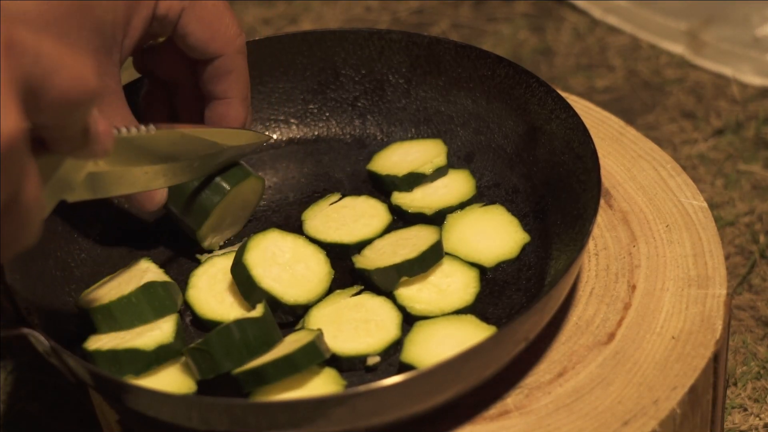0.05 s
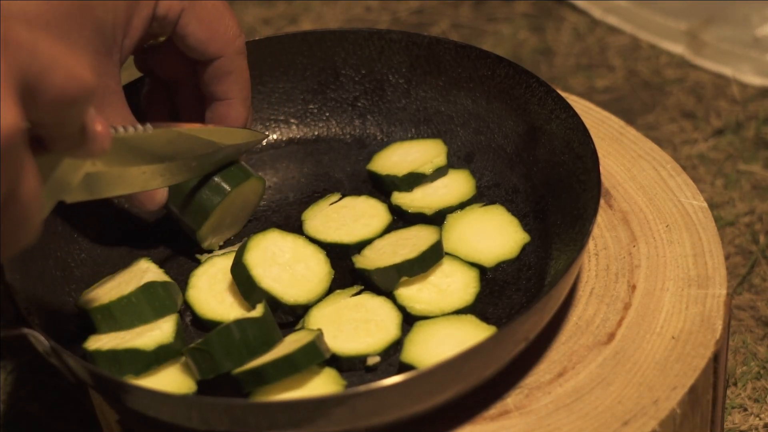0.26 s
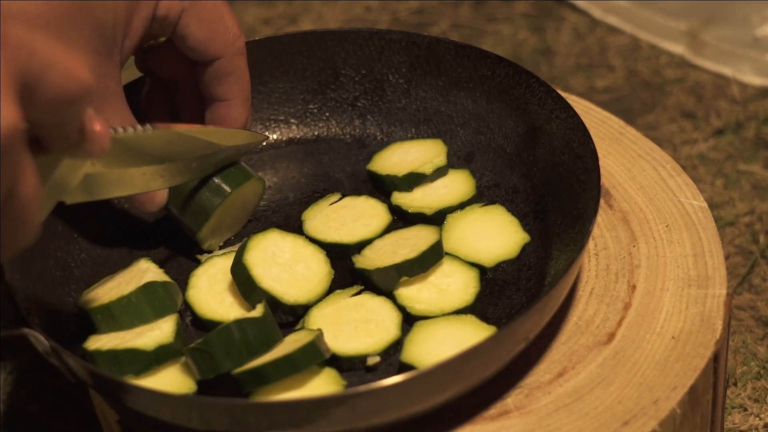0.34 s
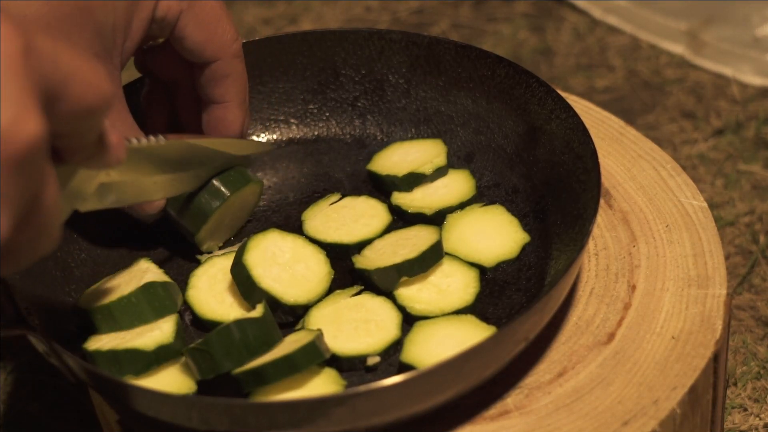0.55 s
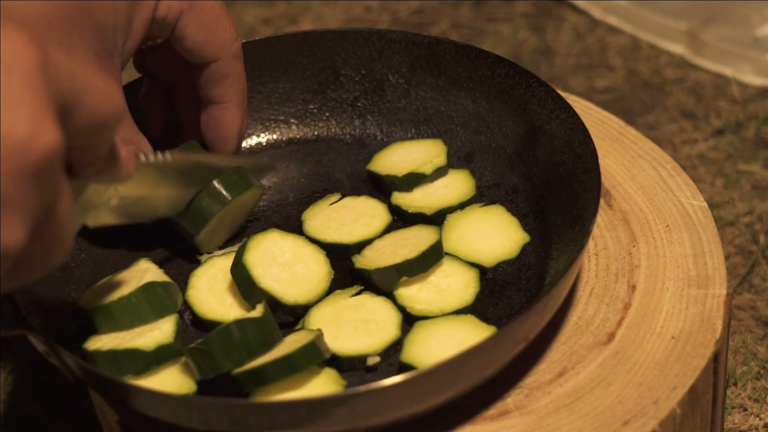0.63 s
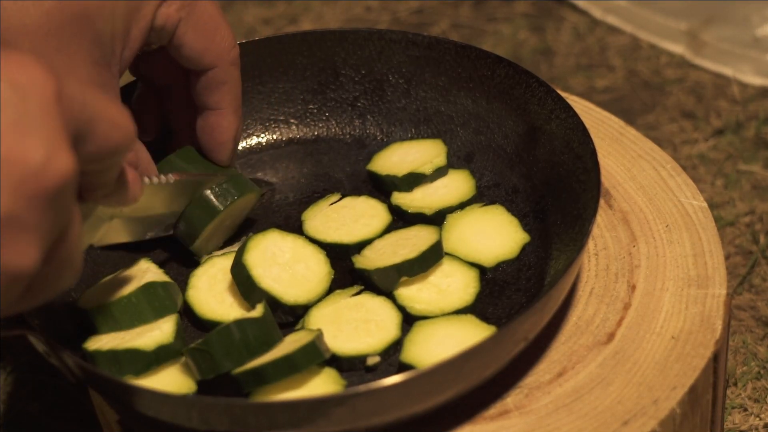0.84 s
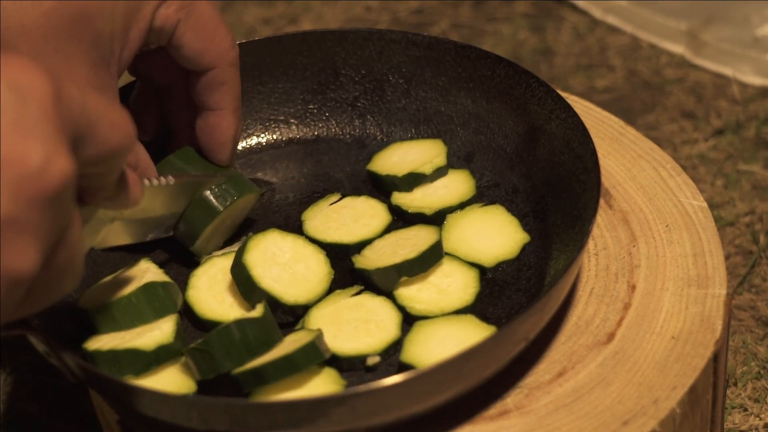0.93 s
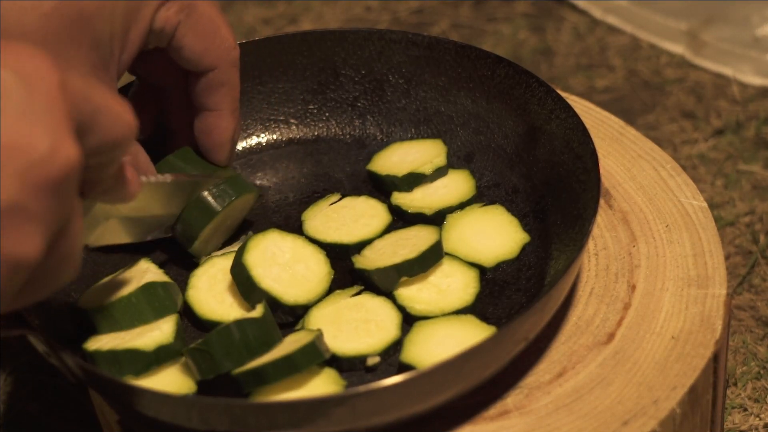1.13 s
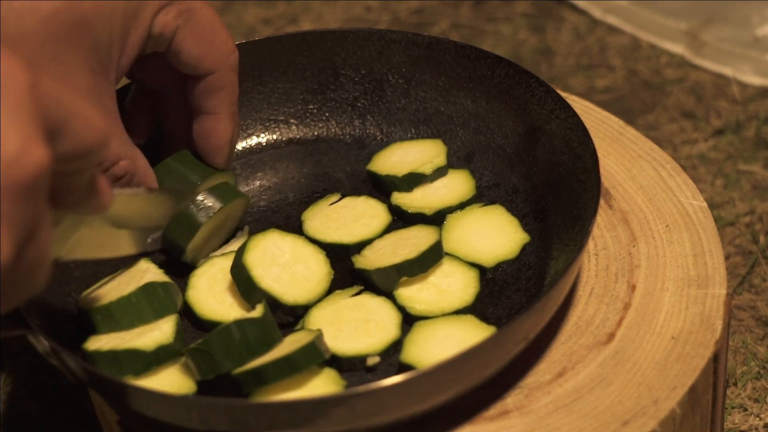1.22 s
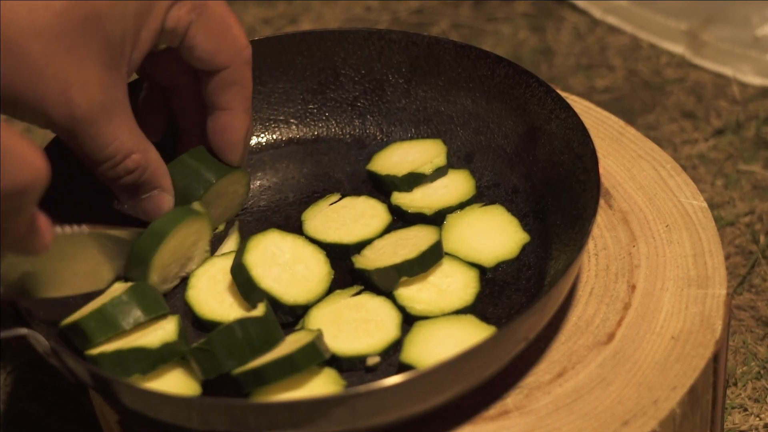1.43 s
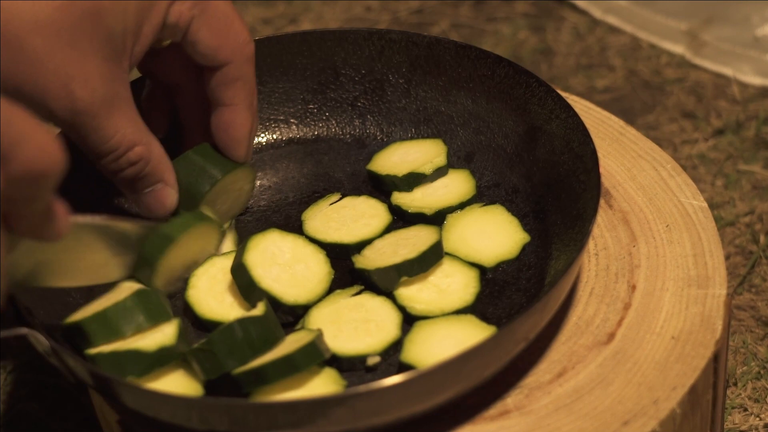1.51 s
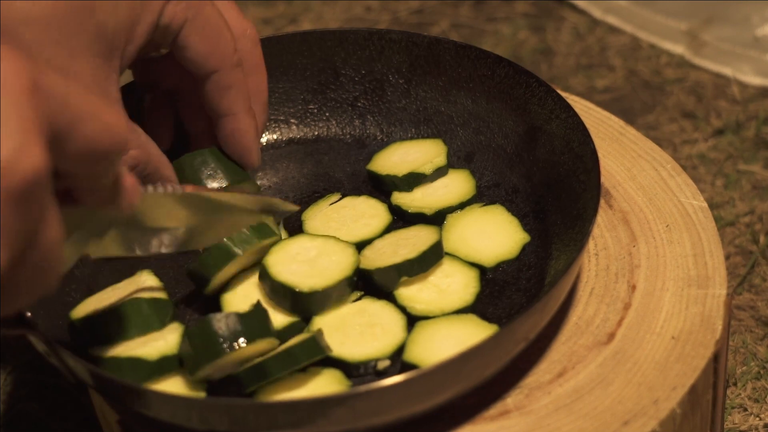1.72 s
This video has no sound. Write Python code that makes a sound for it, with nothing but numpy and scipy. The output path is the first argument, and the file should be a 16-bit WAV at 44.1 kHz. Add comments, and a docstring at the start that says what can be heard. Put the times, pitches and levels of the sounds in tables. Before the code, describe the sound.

Close up, a zucchini is cut twice with a moist hiss and crackling snaps, the blade knocking and scraping on a frying pan before a quick clatter and a dull bump. Gusts rumble on the microphone outdoors.

```python
"""A wet hiss and a run of crisp snaps: a knife slices a zucchini held in a steel frying pan, outdoors. The
blade slides through the flesh, bursting cells and fibres, and the skin gives way in tiny fractures. The edge
knocks and scrapes on the pan, then slips free and clatters; a slice tips over with a dull bump. Wind buffets
the microphone over a soft, even hiss."""
import sys
import numpy as np
from scipy import signal
from scipy.fft import rfft, irfft
from scipy.io import wavfile
from scipy.ndimage import uniform_filter1d

SR = 44100
rng = np.random.default_rng(int(sys.argv[2]) if len(sys.argv) > 2 else 0)


def generate_wav(sig):
    """Save sig (samples, or channels by samples) to the path in sys.argv[1] as 16-bit PCM at SR."""
    pcm = np.round(np.clip(np.atleast_2d(sig).T, -1, 1) * 32767).astype(np.int16)
    wavfile.write(sys.argv[1], SR, pcm)


N = 77175
T = np.arange(N) / SR

# the skin snaps: start_s, level_db, body_db, treble_db, ring_hz, decay_s
SKIN_SNAPS = [(0.015, -32.5, 1, 10.5, 8500, 0.0012), (0.4107, -31, 8, 2, 5140, 0.0017),
              (.6282, -16, -10, -9, 3050, .0011), (0.6359, -18, 4.5, -12, 3000, 0.0013),
              (0.6577, -18, -6, -5.5, 3950, 0.0019), (0.6708, -10.5, -14, -14, 3040, 0.0012),
              (0.6990, -12.5, 3.5, 3, 2380, 0.00084), (0.7120, -15, 6, 5, 8540, .0006),
              (0.7211, -14, 2, 6, 8250, .0007), (0.7258, -16.5, 11, -1, 8200, 0.00091),
              (0.7332, -16.5, 12, 13.5, 8400, 0.0006), (0.7371, -18, 14.5, 9, 8200, 0.00055),
              (0.7476, -20.5, -4, 15, 7850, .0008), (0.75, -22, -5, 8, 7100, 0.00096),
              (.8535, -38.5, 14, 7, 6700, 0.0045), (1.1947, -8.5, 10.5, -6, 6740, 0.0006),
              (1.204, -11.5, 9.5, -2, 3400, 0.00096), (1.2077, -15.5, 1, -0.5, 6900, 0.0013),
              (1.21, -15.5, -12, -10, 6870, 0.0018), (1.2234, -16.5, 4, -9, 7040, .0008),
              (1.2289, -14, 6.5, 7, 2650, 0.001), (1.2521, -8.5, 5.5, -1.5, 8100, .0011),
              (1.2619, -22, -11, 5, 6900, 0.0014), (1.2668, -25, -3, 9, 6860, 0.0015),
              (1.2729, -13, -15, 6, 4100, 0.0012)]
# tone of every snap, crack and crackle: freq_hz, gain_db
CRACK_EQ = [(200, -31.5), (340, -15.5), (500, -2.5), (1800, -1.5), (3200, 2.5), (5600, -3), (7000, 2),
            (8400, -2), (9400, -8), (10700, -13.5), (11600, -10), (12800, -19), (13900, -14), (15200, -32)]
# strokes through the flesh: start_s, peak_s, end_s, level_db, rise_db, fall_db
KNIFE_STROKES = [(.465, .57, 0.75, -31.5, 9, 5), (.89, .95, 1, -40.5, 6.5, 5.5),
                 (1.15, 1.21, 1.29, -43, 1, -4), (1.29, 1.395, 1.493, -31, 9.5, 14)]
# tone of the wet slide: freq_hz, gain_db
SLIDE_EQ = [(200, -8), (500, -3.5), (1000, -3), (1900, -6.5), (3000, -0.5), (4700, -3.5), (6500, 0),
            (8400, -1.5), (10500, -14), (12500, -25), (16000, -32)]
# flesh tears where the blade presses hardest: start_s, peak_s, end_s, level_db, rise_db, fall_db
FLESH_TEARS = [(.56, .665, 0.73, -32, 13, 12), (1.165, 1.205, 1.285, -30, 5.5, 6.5)]
# tone of the bursting cells: freq_hz, gain_db
TEAR_EQ = [(200, -17), (500, -1.5), (1900, -3), (2300, 1.5), (3100, 2), (4200, 0), (4800, -1), (7000, -4.5),
           (8400, -9), (10000, -45), (14000, -13), (16000, -32)]
# fibres give way: start_s, peak_s, end_s, level_db, rise_db, fall_db
FIBRE_CRACKLES = [(.62, .735, .754, -41, 11, -4), (1.19, 1.265, 1.29, -35.5, 5, 8)]
# the edge hits the pan; each spot favours one resonance:
# start_s, level_db, bright_hz, crack_db, favoured_hz, favoured_db
PAN_KNOCKS = [(0.7698, -17.5, 1010, 9.5, 1780, 9), (1.2034, -16.5, 1490, -14, 567, 6),
              (1.2534, -22.5, 980, -6, 584, 8), (1.3666, -23, 2000, -2, 1010, 0),
              (1.3962, -17, 3000, -3.5, 1050, 4.5), (1.429, -28, 2000, -7, 1020, 7)]
# the edge drags on the pan: start_s, peak_s, end_s, level_db, rise_db, fall_db
PAN_SCRAPES = [(.68, .74, 0.92, -38.5, 12, 24), (1.16, 1.21, 1.30, -35, 6, 4.5),
               (1.33, 1.385, 1.8, -43.5, -1.5, 9)]
# ring of the loaded pan: pitch_hz, level_db, t60_s
PAN_MODES = [(482, -1.5, 0.032), (585, -3, 0.029), (695, -2, 0.029), (974, -9, 0.034), (1013, -4.5, 0.041),
             (1435, -7.5, 0.048), (1770, -8.5, 0.035), (3340, -14, 0.015), (4140, -6.5, 0.019),
             (6800, 1, 0.0078)]
# the loose blade taps the pan: start_s, level_db
BLADE_TAPS = [(1.5211, -20), (1.5241, -12.5), (1.5270, -10.5)]
# ring of the blade: pitch_hz, level_db, t60_s
BLADE_MODES = [(496, -3.5, 0.027), (610, -1.5, 0.012), (870, -5, 0.047), (1326, -4.5, 0.02),
               (1950, -6.5, 0.04), (2450, -7.5, 0.034), (2860, -2.5, 0.028), (3370, -8, 0.014),
               (4300, -1.5, 0.017), (5870, 0, 0.011), (6760, 4.5, 0.012), (7330, -6, 0.018)]
# a slice tips over: start_s, level_db, pitch_hz
SLICE_BUMPS = [(1.641, -25.5, 152.3)]
# gusts at the microphone: time_s, buffet_db, rumble_db
WIND_GUSTS = [(0, -45, -37.5), (0.22, -15.5, -49), (.29, -23.5, -45), (.37, -21, -37.5), (.48, -8, -52.5),
              (.54, -15, -48), (.67, -16.5, -42), (0.762, -4, -29.5), (0.879, -5, -27), (.97, -12, -30),
              (1.07, -7, -39.5), (1.14, -8, -41.5), (1.229, -6.5, -32.5), (1.311, -7.5, -41),
              (1.39, -22, -37), (1.49, -20, -42.5), (1.66, -24, -38), (1.75, -21.5, -52)]
# tone of the sub-bass pressure swings: freq_hz, gain_db
BUFFET_EQ = [(5, -18), (13, 5.5), (22, -1), (35, -10.5), (55, -19.5), (90, -34.5), (200, -99)]
# tone of the wind rumble: freq_hz, gain_db
RUMBLE_EQ = [(30, -41), (55, -15), (85, 3.5), (120, -6), (170, -14), (250, -21.5), (400, -28.5),
             (1000, -57)]
# tone of the outdoor bed: freq_hz, gain_db
AIR_EQ = [(60, 6), (150, 12.5), (250, 12), (340, 3.5), (550, 3.5), (1000, 0), (2000, -3.5), (3000, -1),
          (4500, -6), (7500, -11), (10000, -17), (13000, -21.5), (16000, -16.5)]
# tone of the bright hiss on top of it: freq_hz, gain_db
HISS_EQ = [(2000, -5.5), (5000, -3.5), (7500, -1), (9000, -6), (11000, -15), (16000, -19)]
# the bright hiss wanders: time_s, level_db
HISS_FADER = [(0, -57), (.12, -50.5), (.25, -71), (.42, -50), (.8, -51.5), (.98, -49), (1.08, -48.5),
              (1.5, -44), (1.63, -46)]
# the strongest gust overloads the microphone and briefly ducks the background hiss: time_s, gain_db
OVERLOAD_DUCK = [(.75, 0.5), (.815, -7.5), (.87, -2.5), (1.1, -2)]


def skin(body_hz=1490, treble_hz=7000):
    """Each snap is a millisecond or so of fracture that rings briefly, with its own body and treble."""
    middle, body, treble = np.zeros((3, N))
    for start_s, level_db, body_db, treble_db, ring_hz, decay_s in SKIN_SNAPS:
        snap = from_db(level_db) * crack(decay_s)
        snap += from_db(6) * resonance(snap, ring_hz, width_hz=540)
        add(middle, start_s, snap)
        add(body, start_s, from_db(body_db) * snap)
        add(treble, start_s, from_db(treble_db) * snap)
    body = cut(body, body_hz, "low", order=2)
    middle = cut(middle, body_hz, "high", order=2)
    middle = cut(middle, treble_hz, "low", order=2)
    treble = cut(treble, treble_hz, "high", order=2)
    # the middle is flipped so the bands join without notches
    return from_db(-5) * colour(body - middle + treble, CRACK_EQ)


def flesh():
    """The wet blade hisses as it slides; cells burst in a fine crackle under pressure."""
    slide = swells(KNIFE_STROKES) * noise(SLIDE_EQ)
    cells = colour(grains(per_s=2500, spread_db=4), TEAR_EQ)
    return slide + swells(FLESH_TEARS) * cells


def fibres(decay_s=0.00076):
    """Tiny random fractures make a bright, moist crackle as the blade breaks through."""
    fractures = np.abs(grains(per_s=860, spread_db=4.5))
    envelope = signal.oaconvolve(fractures, np.exp(-T / decay_s))[:N]
    ticks = colour(envelope * rng.standard_normal(N), CRACK_EQ)
    return swells(FIBRE_CRACKLES) * rms_one(cut(ticks, hz=7000, kind="high"))


def pan(contact_s=0.00036):
    """The edge knocks and scrapes on a pan damped by its load of slices."""
    friction = grains(per_s=1500, spread_db=1.5)
    scrape = sum((-1) ** k * from_db(db) * ring(friction, hz, t60)
                 for k, (hz, db, t60) in enumerate(PAN_MODES))
    rings, cracks = np.zeros((2, N))
    for start_s, level_db, bright_hz, crack_db, favoured_hz, favoured_db in PAN_KNOCKS:
        knock = strike(PAN_MODES, contact_s, bright_hz, favoured_hz, favoured_db)
        add(rings, start_s, from_db(level_db) * knock)
        attack = from_db(level_db + crack_db) * crack(decay_s=0.0018)
        add(cracks, start_s, cut(attack, bright_hz, "low"))
    return swells(PAN_SCRAPES) * rms_one(scrape) + from_db(-3) * rings + colour(cracks, CRACK_EQ)


def blade_clatter():
    """The blade slips free against the pan: quick hard taps, each a crack and a short ring."""
    rings, cracks = np.zeros((2, N))
    for start_s, level_db in BLADE_TAPS:
        add(rings, start_s, from_db(level_db) * strike(BLADE_MODES, contact_s=0.00055, bright_hz=9000))
        add(cracks, start_s, from_db(level_db) * crack(decay_s=0.0012))
    cracks = cut(colour(cracks, CRACK_EQ), hz=10800, kind="low", order=2)
    return from_db(-9) * rings + from_db(-8.5) * cracks


def slice_bump(rise_s=0.0038, t60_s=0.15):
    """A slice tipping over gives a soft, low thud that dies quickly."""
    out, age = np.zeros(N), T[:8000]
    envelope = (1 - np.exp(-age / rise_s)) * from_db(-60 * age / t60_s)
    for start_s, level_db, pitch_hz in SLICE_BUMPS:
        add(out, start_s, from_db(level_db) * envelope * np.sin(2 * np.pi * pitch_hz * age))
    return out


def wind(evenness=0.92):
    """Gusts push on the microphone: slow pressure swings and a lumpy rumble."""
    time_s, buffet_db, rumble_db = np.transpose(WIND_GUSTS)
    swings = noise(BUFFET_EQ)
    strength = np.sqrt(uniform_filter1d(np.abs(signal.hilbert(swings)) ** 2, size=2200))
    buffet = rms_one(swings / strength ** evenness)  # levelled, so the gusts set the dynamics
    return fader(time_s, buffet_db) * buffet + fader(time_s, rumble_db) * noise(RUMBLE_EQ)


def air():
    """Soft outdoor hiss with wandering treble, ducked where the strongest gust overloads the mic."""
    bed = from_db(-42) * noise(AIR_EQ)
    hiss = fader(*np.transpose(HISS_FADER)) * noise(HISS_EQ)
    return fader(*np.transpose(OVERLOAD_DUCK)) * (bed + hiss)


def crack(decay_s, rise_s=0.00026, crumble_db=-20.5, crumble_s=0.0068, size=1024):
    """A brief burst of fracture noise that builds, dies and crumbles away."""
    age = T[:size]
    tail = np.exp(-age / decay_s) + from_db(crumble_db) * np.exp(-age / crumble_s)
    envelope = (1 - np.exp(-age / rise_s)) * tail
    spectrum = rfft(envelope * rng.standard_normal(size))
    flat_burst = irfft(spectrum / (np.abs(spectrum) + 1e-9), size)
    tight_burst = flat_burst * envelope ** .25  # trims the smear left by flattening the tone
    return rms_one(tight_burst) * np.sqrt(np.mean(envelope ** 2))


def strike(modes, contact_s, bright_hz, favoured_hz=1000, favoured_db=0, width_oct=0.13, uneven_db=2.5):
    """A short contact sets each mode ringing at its own strength; thin steel radiates little bass."""
    age = T[:3000]
    hz, db, t60 = np.transpose(modes)[:, :, None]
    spot_db = favoured_db * np.exp(-(np.log2(hz / favoured_hz) / width_oct) ** 2)
    gain = from_db(db + spot_db + uneven_db * rng.standard_normal(hz.shape))
    gain /= np.hypot(1, hz / bright_hz)
    polarity = (-1) ** np.arange(len(hz))[:, None]
    rings = polarity * gain * np.sin(2 * np.pi * hz * age) * from_db(-60 * age / t60)
    attack = 1 - np.exp(-age / contact_s)
    return cut(attack * rings.sum(axis=0), hz=394, kind="high", order=4)


def ring(force, hz, t60):
    """One mode: a unit click sets a sine of height 1 ringing."""
    radius, angle = from_db(-60 / (t60 * SR)), 2 * np.pi * hz / SR
    feedback = [1, -2 * radius * np.cos(angle), radius ** 2]
    return signal.lfilter([0, np.sin(angle)], feedback, force + 1e-18)


def resonance(x, hz, width_hz):
    """A broad resonance with unit gain at its top."""
    radius = np.exp(-np.pi * width_hz / SR)
    feedback = [1, -2 * radius * np.cos(2 * np.pi * hz / SR), radius ** 2]
    return signal.lfilter(np.array([1, 0, -1]) * (1 - radius ** 2) / 2, feedback, x + 1e-18)


def grains(per_s, spread_db):
    """Random clicks of uneven size, unit rms."""
    sizes = from_db(spread_db * np.minimum(rng.exponential(1, N), 4)) * rng.choice([-1, 1], N)
    return rms_one(sizes * (rng.random(N) < per_s / SR))


def swells(gestures, edge_s=0.0057):
    """Each gesture rides two level ramps, with a softened start and stop."""
    out = np.zeros(N)
    for start, peak, end, db, rise_db, fall_db in gestures:
        out += (T > start) * (T < end) * fader([start, peak, end], [db - rise_db, db, db - fall_db])
    return uniform_filter1d(out, int(edge_s * SR))


def fader(time_s, level_db):
    """A gain ride through level points."""
    return from_db(np.interp(T, time_s, level_db))


def eq_gains(eq, size):
    """An EQ curve as one gain per FFT bin."""
    hz, db = np.transpose(eq)
    return from_db(np.interp(np.log(np.fft.rfftfreq(size, 1 / SR) + 1), np.log(hz), db))


def colour(x, eq, size=1024):
    """Minimum-phase EQ of unit power gain: attacks stay sharp."""
    gain = rms_one(eq_gains(eq, size))
    cepstrum = irfft(np.log(gain), size) * (1 + np.sign(np.fft.fftfreq(size)))
    impulse = irfft(np.exp(rfft(cepstrum)), size)
    return signal.oaconvolve(x, impulse)[:N]


def noise(eq):
    """Coloured noise of unit rms."""
    return rms_one(irfft(rfft(rng.standard_normal(N)) * eq_gains(eq, N), N))


def cut(x, hz, kind, order=1):
    """Low- or high-pass."""
    return signal.sosfilt(signal.butter(order, hz, kind, fs=SR, output="sos"), x + 1e-18)


def add(out, start_s, sound):
    """Mix a short sound in at its cue."""
    i = int(start_s * SR)
    out[i:i + len(sound)] += sound[:len(out) - i]


def from_db(db):
    """Decibels to gain."""
    return 10 ** (np.asarray(db) / 20)


def rms_one(x):
    """Scale to unit rms."""
    return x / np.sqrt(np.mean(x ** 2) + 1e-20)


def scene():
    """Knife, zucchini and pan close by, in the open air, in mono."""
    return (skin() + flesh() + pan() + blade_clatter() + wind() + air() + fibres() + slice_bump())[None]


def record(dry, cutoff_hz=15750):
    """The strongest gusts overload the microphone; the very top is cut."""
    soft_clipped = dry / (1 + dry ** 12) ** (1 / 12)
    return signal.sosfilt(signal.ellip(12, .2, 80, cutoff_hz, fs=SR, output="sos"), soft_clipped)


dry = scene()
out = record(dry)
generate_wav(out)
```